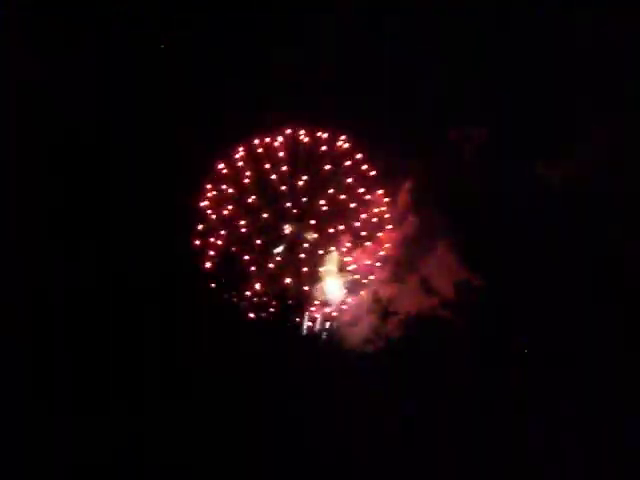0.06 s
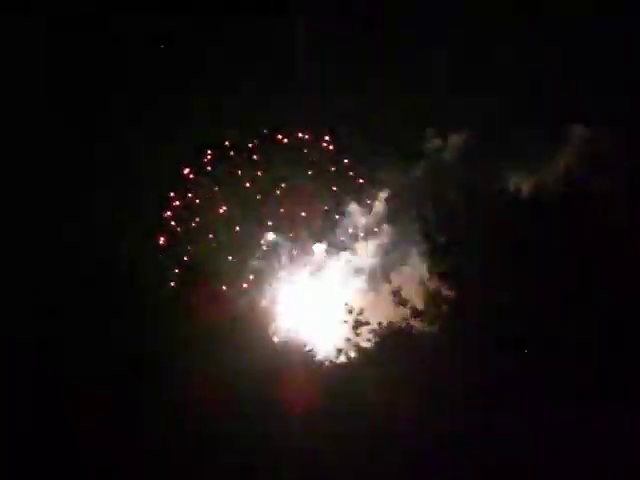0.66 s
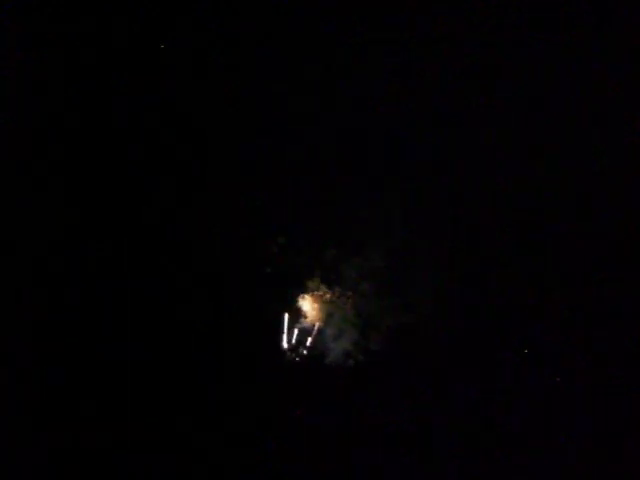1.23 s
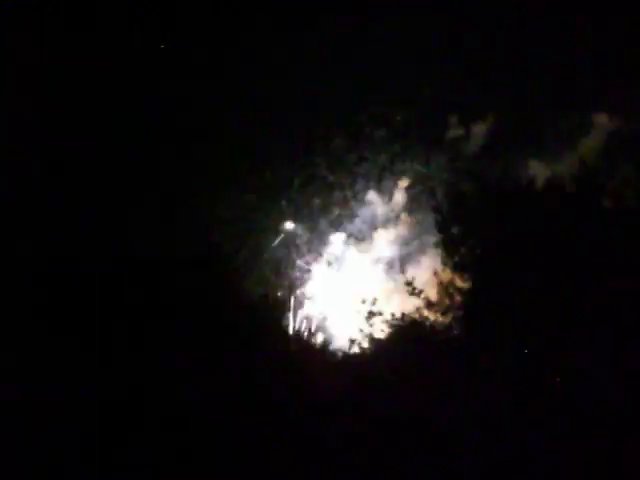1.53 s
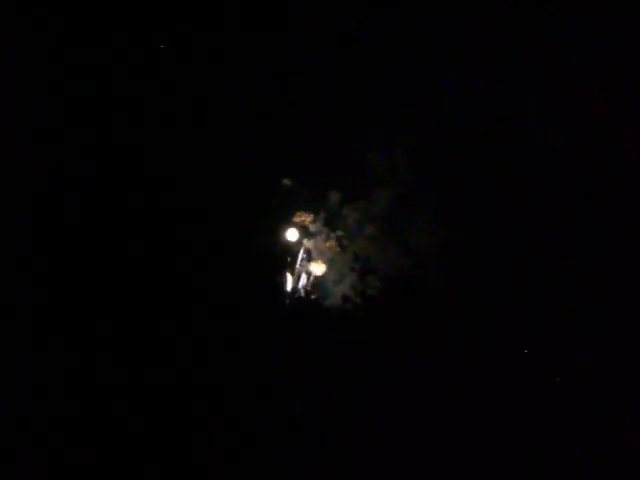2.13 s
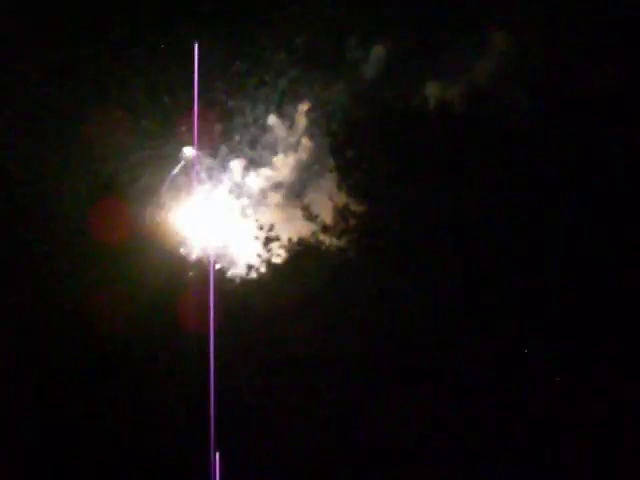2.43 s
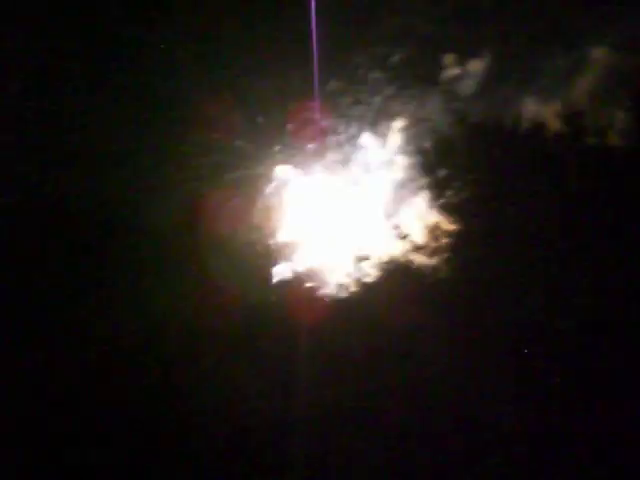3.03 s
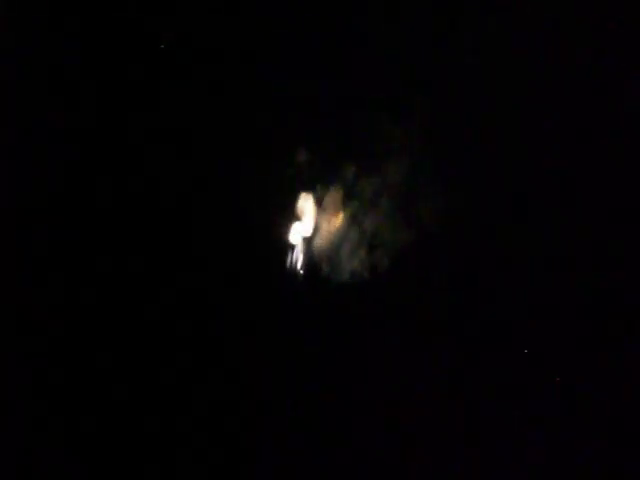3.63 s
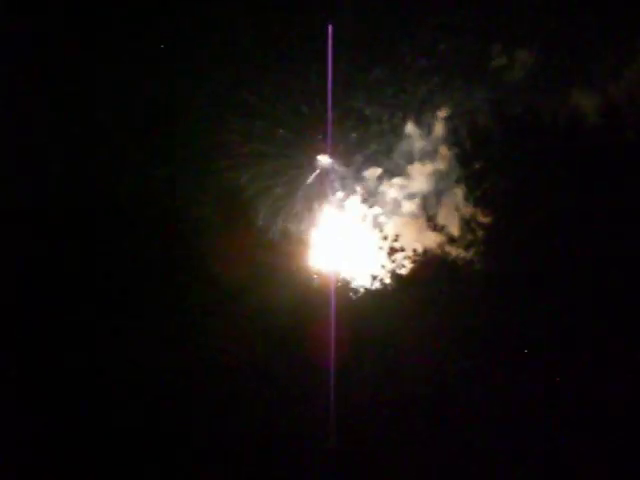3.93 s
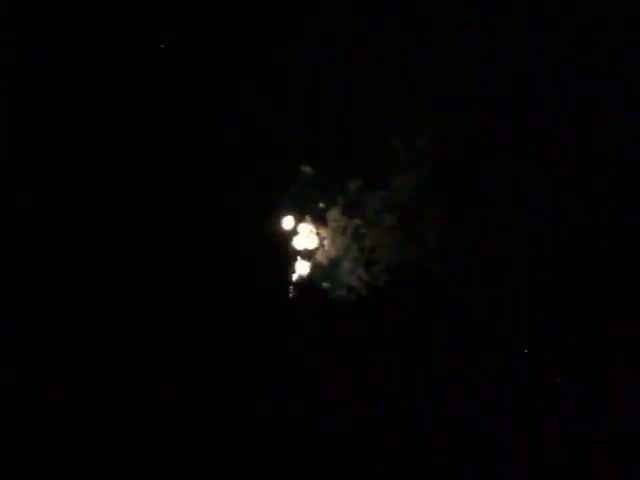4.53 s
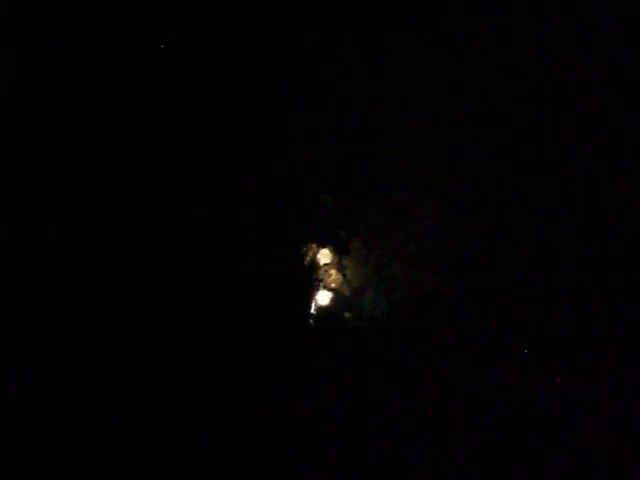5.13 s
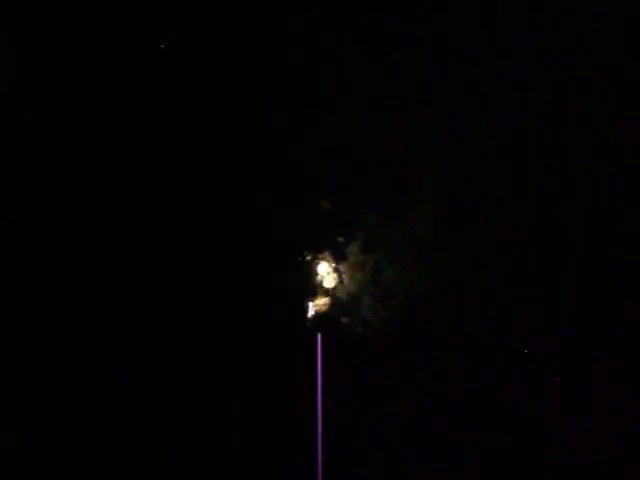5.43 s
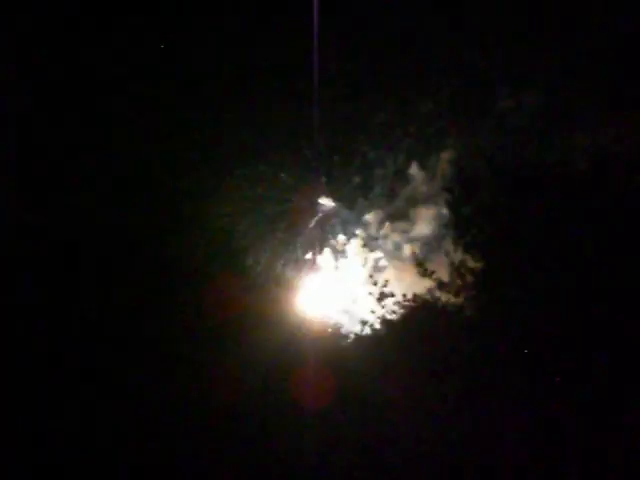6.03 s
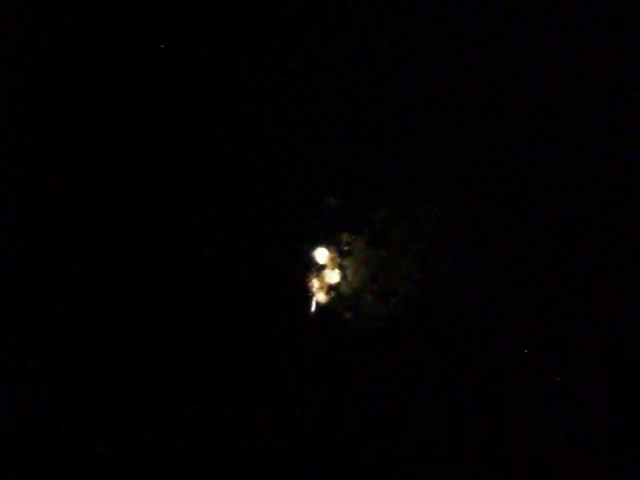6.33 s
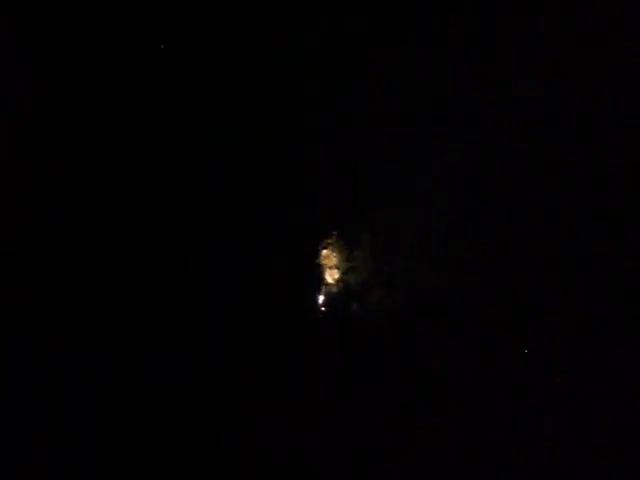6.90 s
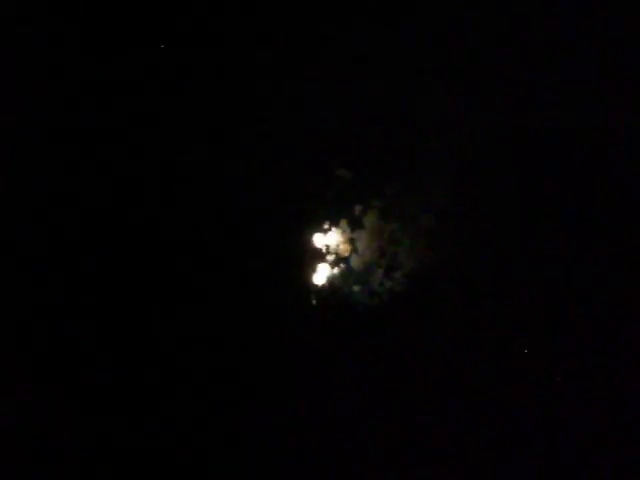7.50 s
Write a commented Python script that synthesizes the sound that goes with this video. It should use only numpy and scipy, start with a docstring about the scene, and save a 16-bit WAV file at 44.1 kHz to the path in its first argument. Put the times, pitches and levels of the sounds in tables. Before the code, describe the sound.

Sharp firework bangs come singly, then in rapid clusters, over distant pops and a low echoing rumble outdoors.

```python
"""A low rumble and a far pop come first, then firework salutes in an irregular string, heard from open
ground at night. Each burst sends an N-shaped shock wave to the microphone, then reflections from the
ground and things nearby, and a long scattered tail. Echoes roll in from afar, distant trees throw back a
hiss, sparks fizz and snap. The camera's gain control ducks at the loud bangs, so rumble and hiss sink
and swell back."""
import sys
import numpy as np
from scipy import signal
from scipy.fft import rfft, irfft, next_fast_len
from scipy.io import wavfile

SR = 44100
rng = np.random.default_rng(int(sys.argv[2]) if len(sys.argv) > 2 else 0)


def int16_out(signal):
    """Quantize to a 16-bit WAV file."""
    q = np.round(np.clip(np.atleast_2d(signal).T, -1, 1) * 32767)
    wavfile.write(sys.argv[1], SR, q.astype(np.int16))


N = 342216
TIME = np.arange(N) / SR


def from_db(db):
    """Decibels to gain."""
    return 10 ** (np.asarray(db) / 20)


def rms_one(x):
    """Scale to unit rms."""
    return x / np.sqrt(np.mean(x ** 2) + 1e-20)


def level_curve(rows):
    """Gain over time from rows of t/s, level/dB."""
    return from_db(np.interp(TIME, *np.transpose(rows)))


def cut(x, hz, kind="low", order=2):
    """Butterworth low- or high-pass."""
    sections = signal.butter(order, np.clip(hz, 10, .45 * SR), kind, fs=SR, output="sos")
    return signal.sosfilt(sections, x + 1e-18)


def smooth(x, seconds):
    """One-pole lag."""
    r = np.exp(-1 / (seconds * SR))
    return signal.lfilter([1 - r], [1, -r], x)


def coloured(x, colour):
    """Shape a white signal by rows of f/Hz, level/dB; rms 1."""
    hz, db = np.transpose(colour)
    size = next_fast_len(len(x))
    bins_hz = np.maximum(np.fft.rfftfreq(size, 1 / SR), 1)
    gain = from_db(np.interp(np.log(bins_hz), np.log(hz), db))
    return rms_one(irfft(rfft(x, size) * gain, size)[:len(x)])


def resonance(x, hz, width_hz):
    """Two-pole band-pass, gain 1 at its peak."""
    r = np.exp(-np.pi * width_hz / SR)
    feedback = [1, -2 * r * np.cos(2 * np.pi * hz / SR), r * r]
    return signal.lfilter(np.array([1, 0, -1]) * (1 - r * r) / 2, feedback, x)


def grains(per_s, spread_db):
    """Random clicks of uneven size; rms 1."""
    sizes = from_db(spread_db * np.minimum(rng.exponential(1, N), 4)) * rng.choice([-1, 1], N)
    return rms_one(sizes * (rng.random(N) < per_s / SR))


# Rumble in the distance, beneath the rolls: t/s, level/dB
RUMBLE_LEVEL = [(0, -30), (1.15, -33.5), (1.5, -27), (2.2, -28.5), (2.9, -40), (3.4, -22), (4.2, -21.5),
                (5.4, -27.5), (6.1, -24.5), (7.76, -22.5)]
# Spectrum of rumble and rolls from far across the ground: f/Hz, relative level/dB
ROLL_SPECTRUM = [(25, -34), (60, -3), (110, -2), (165, 4), (250, -8.5), (350, 1), (480, -8), (800, -7),
                 (1000, -12.5), (1600, -18), (2300, -27), (3500, -47.5), (6000, -55)]
def rolling_echoes():
    """Far bangs and the salutes' slow echoes overlap into a lumpy rumble."""
    arrivals = grains(per_s=620, spread_db=2.5) + from_db(3) * rng.standard_normal(N)
    rolls = from_db(-26) * echo_level(build_s=0.013, t60=4.1, db_share=0.65)
    return np.hypot(rolls, level_curve(RUMBLE_LEVEL)) * coloured(arrivals, ROLL_SPECTRUM)


# Small shells far from the microphone: t/s, relative level/dB
FAR_SHELLS = [(0.056, -17.5), (0.79, -10), (0.827, -23), (0.972, -16), (1.161, -16), (3.251, -9.5),
              (3.782, -7), (4.163, -10), (4.494, -6), (6.194, -2), (7.555, -6.5)]
def far_pops(gain_db=-11, length_ms=0.87, front_hz=1700, scatter_db=10, air_hz=2800):
    """Small shells give short dull pops, blurred by distance."""
    bursts = [(s, db + gain_db, length_ms, front_hz, scatter_db) for s, db in FAR_SHELLS]
    return cut(shocks(bursts, scatter_t60=0.038), air_hz, order=4)


def n_wave(length_ms, front_hz, spike=1.06, spike_ms=0.3, rear_ms=0.4):
    """A sharp front shock, a ramp through zero into suction, and a softer rear shock; polarity inverted."""
    ms = np.arange(4096) * 1000 / SR
    ramp = 1 + spike * np.exp(-ms / spike_ms) - 2.4 * ms / length_ms
    rear_shock = np.clip((length_ms - ms) / rear_ms + .5, 0, 1)
    return -cut(ramp * rear_shock, front_hz)


# Paths off the ground and things near the microphone: delay/ms, gain, lowest f/Hz, highest f/Hz
NEAR_PATHS = [(1.279, 0.74, 384, 2400), (3.37, 0.74, 430, 1340), (5.821, 0.88, 16, 1400),
              (6.718, 0.42, 32, 2200), (12.06, 0.32, 51, 2700), (30.7, 0.27, 20, 960),
              (41.5, 0.083, 30, 120)]
def reflected(wave, stray_ms=0.077, uneven_db=0.25):
    """Add the near reflections; every shell bursts somewhere else, so their paths differ a little."""
    ms = 1000 * TIME[:len(wave)]
    out = wave
    for delay_ms, gain, low_hz, high_hz in NEAR_PATHS:
        echo = cut(cut(wave, high_hz, order=1), low_hz, "high", order=1)
        late, loud = rng.standard_normal(2)
        delayed = np.interp(ms - delay_ms - stray_ms * late, ms, echo, left=0)
        out = out + gain * from_db(uneven_db * loud) * delayed
    return out


def shocks(bursts, scatter_t60, low_hz=900, high_hz=2600):
    """Each burst arrives as an N-wave, its reflections and a short midrange blur of scattered sound."""
    out = np.zeros(N + SR)
    for s, db, length_ms, front_hz, scatter_db in bursts:
        wave = reflected(n_wave(length_ms, front_hz))
        blur = rng.standard_normal(len(wave)) * from_db(-60 * TIME[:len(wave)] / scatter_t60)
        blur = cut(blur / np.linalg.norm(blur), high_hz, order=4)
        blur = cut(blur, low_hz, "high")
        scattered = from_db(scatter_db) * signal.fftconvolve(wave, blur)[:len(wave)]
        start = round(s * SR)
        out[start:start + len(wave)] += from_db(db) * (wave + scattered)
    return out[:N]


# Salutes over the open ground, near the microphone: t/s, relative level/dB, front sharpness f/Hz
NEAR_SHELLS = [(0.3823, -4, 3140), (0.515, 0.5, 3950), (0.547, 1.5, 3440), (1.1924, -4, 4660),
               (1.3208, 0, 2780), (1.6178, 6, 2730), (1.631, 5, 3660), (1.877, 1, 3530), (2.266, -3, 2330),
               (3.1302, 5.5, 4400), (3.4115, 4.5, 3600), (3.8187, 5, 5600), (3.8474, 6, 1890),
               (3.8871, 5, 2780), (3.9056, 8.5, 5000), (3.912, 3.5, 2460), (3.9532, 7, 2760),
               (4.008, 8, 3120), (4.0762, 9, 3860), (4.2193, 8, 2600), (4.5393, 3, 2380),
               (4.7001, 3.5, 2000), (4.8156, 4, 4200), (4.8207, 2, 2600), (4.8661, 7, 1800),
               (4.9078, 7.5, 3680), (4.9747, 7.5, 3570), (4.9832, 9.5, 4100), (5.069, 10, 2020),
               (5.1149, 12.5, 3600), (5.2393, 10.5, 2300), (5.6899, 4, 2250), (5.7577, 4.5, 3300),
               (5.8463, 5, 1650), (5.9196, 7.5, 3680), (6.2752, 0, 2530), (6.3314, 1.8, 1650),
               (6.6387, 0.5, 4630), (6.7316, 0, 2860), (6.796, 2.2, 2050), (6.804, 3.5, 1510),
               (6.907, 5.5, 3900), (7.1991, 2, 1900), (7.2785, 4, 3400), (7.3009, 2.5, 2060),
               (7.4007, 3.5, 4020), (7.5925, 2.5, 3600), (7.634, 3, 1700), (7.7043, 3.5, 1430)]
def salutes(typical_ms=2.61, spread=0.048, scatter_db_per_octave=10.5):
    """Shells of much the same size burst with a hard crack, their N-waves nearly equal in length."""
    s, db, front_hz = np.transpose(NEAR_SHELLS)
    length_ms = typical_ms * np.exp(spread * rng.standard_normal(len(s)))
    # sharper fronts scatter more from things close by
    scatter_db = -6 + scatter_db_per_octave * np.log2(front_hz / 3000)
    return shocks(zip(s, db, length_ms, front_hz, scatter_db), scatter_t60=0.014)


def echo_level(build_s, t60, db_share=1):
    """Gain of echoes that build up after each salute and die away; overlapping ones add in power."""
    power = np.zeros(N)
    for s, db, _ in NEAR_SHELLS:
        power[round(s * SR)] += from_db(db_share * db) ** 2
    swell = from_db(-60 * TIME / t60) ** 2 * (1 - np.exp(-TIME / build_s))
    return np.sqrt(np.abs(signal.fftconvolve(power, swell)[:N]))


# Spectrum returned by the terrain all around: f/Hz, relative level/dB
TERRAIN_SPECTRUM = [(30, -2), (160, 11.5), (350, 9), (800, 10), (1500, 3.5), (2400, -0.5), (3500, -11),
                    (5000, -23), (7000, -42), (12000, -52)]
def terrain_tail():
    """Countless weak echoes from the terrain build up after each salute and die away as one wash."""
    level = from_db(-29) * echo_level(build_s=0.0017, t60=1.53)
    return level * coloured(rng.standard_normal(N), TERRAIN_SPECTRUM)


# Echoes from distant trees: t/s, level/dB
TREE_RETURNS = [(0.55, -44), (1.882, -43), (3.15, -29), (3.9, -45), (4.75, -29), (6.702, -42.5)]
# Their bright spectrum at the microphone: f/Hz, relative level/dB
TREE_SPECTRUM = [(800, -17), (2000, 3), (3500, -4), (5200, -15), (7000, -24), (12000, -44.5)]
def tree_echoes(build_s=0.083, t60=1.67):
    """Foliage returns some of the hard cracks as a crackling hiss that swells and fades."""
    level = 0
    for s, db in TREE_RETURNS:
        age = np.maximum(TIME - s, 0)
        level = level + from_db(db - 60 * age / t60) * (1 - np.exp(-age / build_s))
    return level * coloured(grains(per_s=2200, spread_db=-1), TREE_SPECTRUM)


# Sparks burning in the air, heard from the ground: t/s, level/dB
FIZZ_LEVEL = [(0, -79), (1.95, -47), (2.35, -62), (2.7, -55.5), (3.0, -55), (3.3, -56), (7.76, -73)]
# Spectrum of their fizz: f/Hz, relative level/dB
FIZZ_SPECTRUM = [(1000, -27), (4000, 0.5), (8000, -6.5), (12000, -5), (16000, 7)]
# Single sparks that snap: t/s, relative level/dB
SPARK_SNAPS = [(2.092, -32), (2.24, -42)]
def sparks(snap_t60=0.023):
    """Burning stars fizz in tiny dense crackles; a few snap on their own."""
    fizz = level_curve(FIZZ_LEVEL) * coloured(grains(per_s=1900, spread_db=2.5), FIZZ_SPECTRUM)
    snap_level = sum((TIME > s) * from_db(db - 60 * np.abs(TIME - s) / snap_t60) for s, db in SPARK_SNAPS)
    snaps = resonance(snap_level * rng.standard_normal(N) + 1e-18, hz=6000, width_hz=4500)
    return fizz + snaps


def scene():
    """Everything that reaches one microphone on open ground."""
    return (rolling_echoes() + far_pops() + salutes() + terrain_tail() + tree_echoes() + sparks())[None]


def gain_control(x, ceiling_db=-13, release_db_per_s=21):
    """The gain drops when the power passes the ceiling, too late for the front shock, and creeps back."""
    power_db = 10 * np.log10(smooth(x ** 2, seconds=.003) + 1e-12)
    over_db = np.maximum(power_db - ceiling_db, 0)
    release_db = release_db_per_s * TIME
    duck_db = np.maximum.accumulate(over_db + release_db) - release_db
    return x * from_db(-smooth(duck_db, seconds=.0008))


# Whine of the camera's electronics, behind the microphone: f/Hz, level/dB going into the gain control
WHINE_TONES = [(13184, -68.8), (14985, -63.1)]
# Spectrum of the camera's hiss: f/Hz, relative level/dB
HISS_SPECTRUM = [(100, 6), (5000, -3.5), (7000, -9), (9000, -3), (15300, -7), (16200, -17)]
def record(dry, hiss_db=-64.5, floor_db=-74, whine_leak_db=-20, grit_db=-44, top_hz=16000):
    """The camera's microphone colours the sound; its electronics hiss, whine, duck and overload."""
    mic = cut(dry[0], 32, "high", order=3)
    mic = mic + 0.35 * resonance(mic, hz=684, width_hz=370) + 0.44 * resonance(mic, hz=364, width_hz=30)
    whine = sum(np.sqrt(2) * from_db(db) * np.sin(2 * np.pi * hz * TIME) for hz, db in WHINE_TONES)
    hiss = coloured(rng.standard_normal(N), HISS_SPECTRUM)
    levelled = gain_control(mic + from_db(hiss_db) * hiss + whine)
    # a little hiss and whine escape the ducking
    levelled = levelled + from_db(floor_db) * hiss + from_db(whine_leak_db) * whine
    # a faint treble grit rides on the loudest swings
    swing = np.minimum(4 * levelled ** 2, 1)
    grit = cut(swing * rng.standard_normal(N), 7000, "high")
    clipped = np.clip(levelled + from_db(grit_db) * grit, -.71, .62)
    top_cut = signal.ellip(10, .1, 90, top_hz, fs=SR, output="sos")
    return signal.sosfilt(top_cut, clipped)[None]


dry = scene()
out = record(dry)
int16_out(out)
```